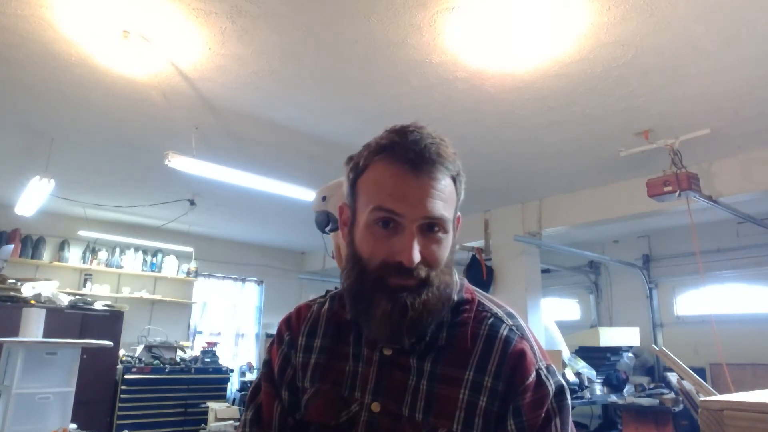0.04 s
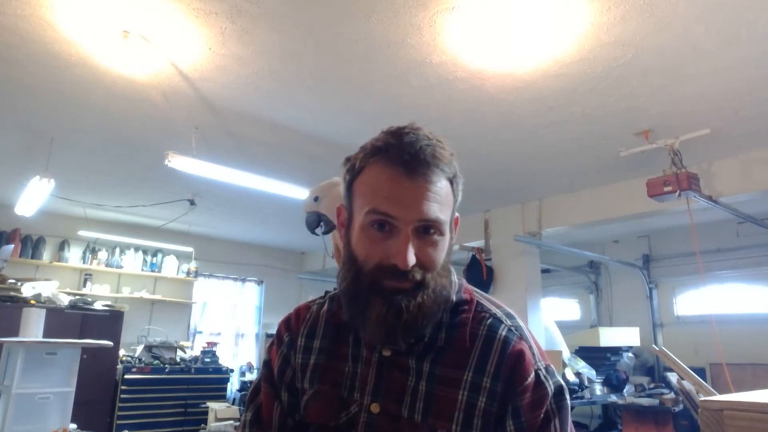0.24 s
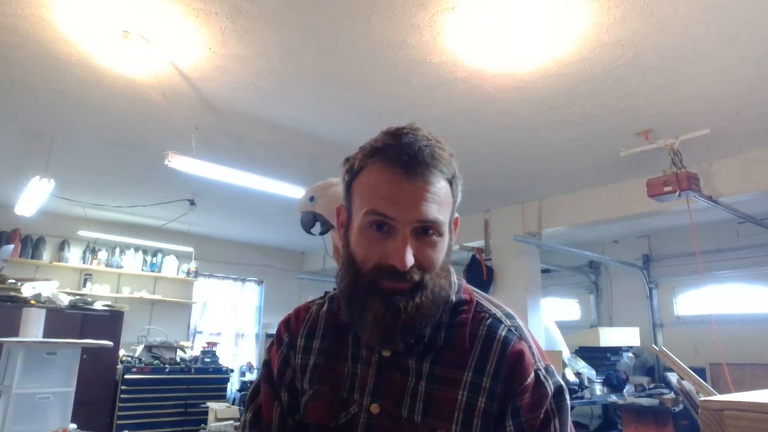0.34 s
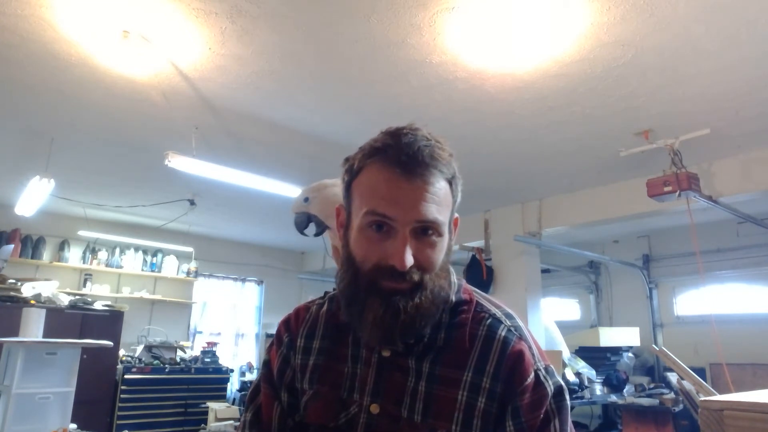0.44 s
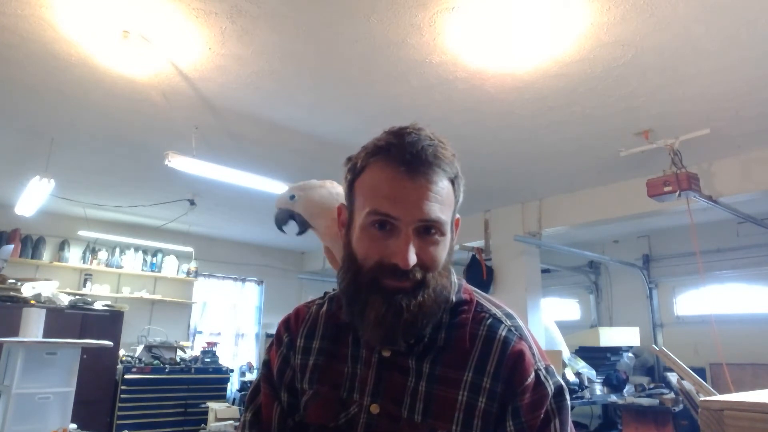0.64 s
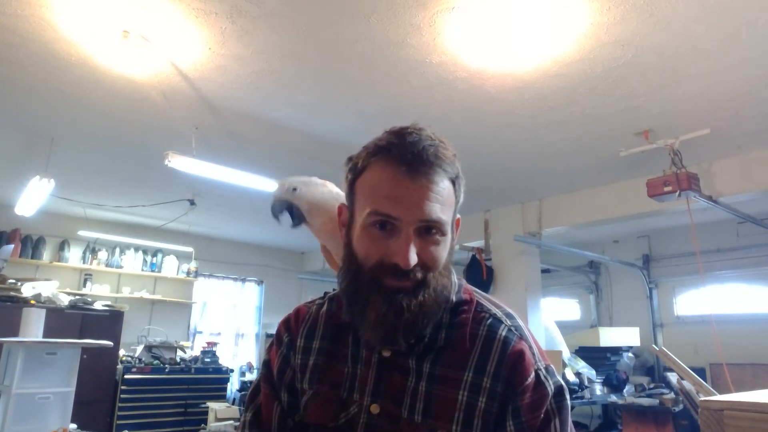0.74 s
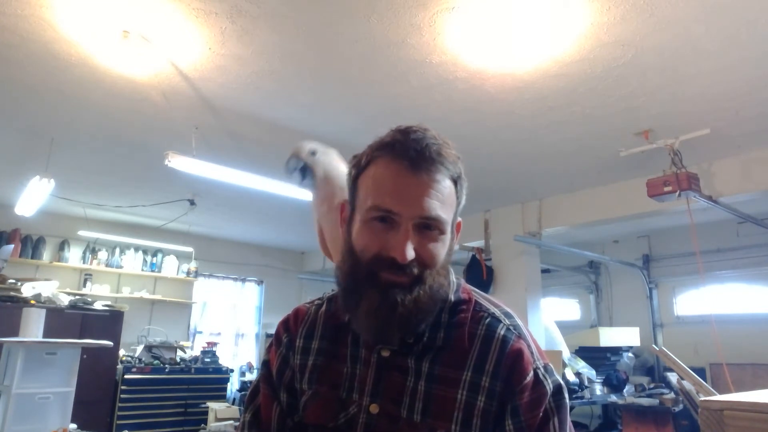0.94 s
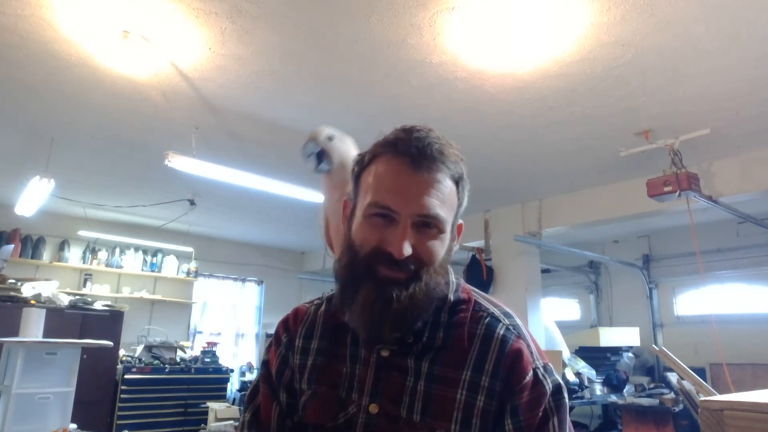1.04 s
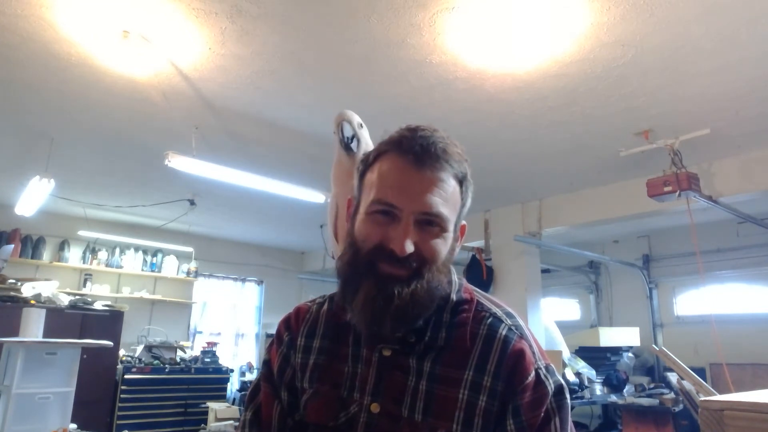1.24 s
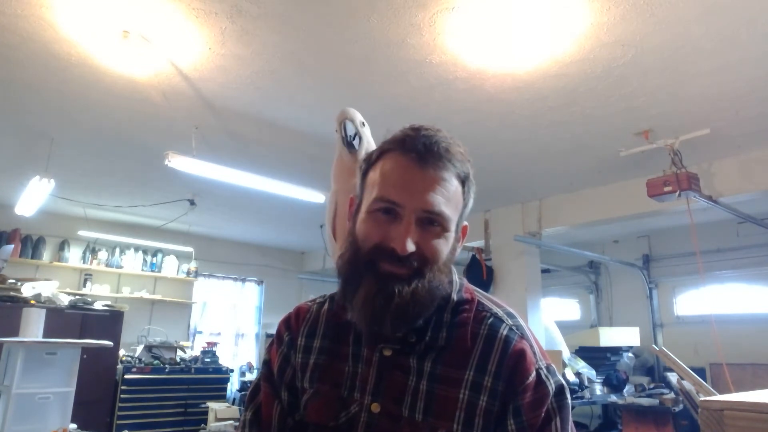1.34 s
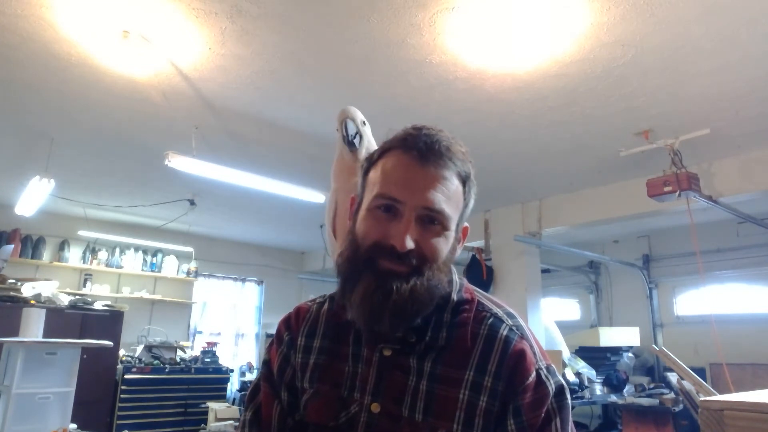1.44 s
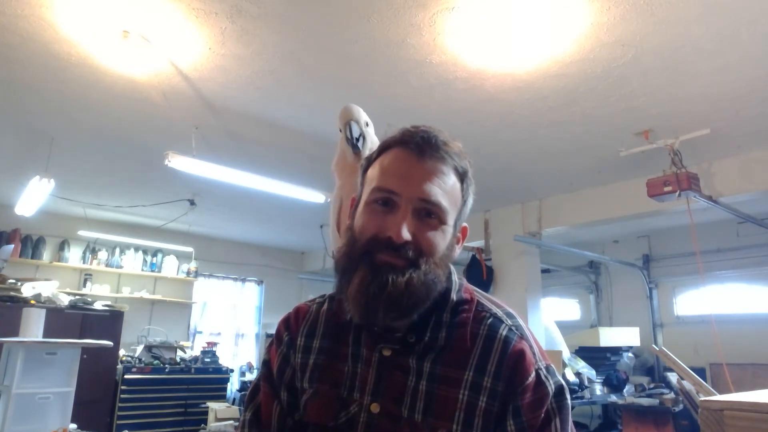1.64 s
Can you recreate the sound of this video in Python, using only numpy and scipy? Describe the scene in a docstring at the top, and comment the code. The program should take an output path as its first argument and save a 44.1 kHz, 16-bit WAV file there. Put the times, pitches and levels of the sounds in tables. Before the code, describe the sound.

A cockatoo lets out one long, harsh, piercing screech that rings in a bare workshop

```python
"""A cockatoo gives one long harsh screech into a small voice microphone in a bare workshop.
Uneven pulses and breath noise ring throat resonances that shift during the call; wavering tones pierce it.
Dense reflections ring after it, over faint noise, a hum and a lingering low note.
The overloaded microphone crackles low down; a noise suppressor cuts the treble of the tail short."""
import sys
import numpy as np
from scipy import signal
from scipy.fft import rfft, irfft
from scipy.io import wavfile
from scipy.ndimage import uniform_filter1d, minimum_filter1d

SR = 44100
rng = np.random.default_rng(int(sys.argv[2]) if len(sys.argv) > 2 else 0)


def inscribe(sig):
    """Save sig as 16-bit PCM at rate SR to the path in sys.argv[1].

    A 1-D sig is mono; a 2-D sig holds one channel per row.
    Samples are clipped to [-1, 1] before scaling.
    """
    pcm = np.round(np.clip(np.atleast_2d(sig).T, -1, 1) * 32767)
    wavfile.write(sys.argv[1], SR, pcm.astype(np.int16))


N = 74970


def from_db(db):
    """Amplitude factor of a level in dB."""
    return 10 ** (np.asarray(db) / 20)


def rms_one(x):
    """Scales a signal to an rms of 1."""
    return x / np.sqrt(np.mean(x ** 2) + 1e-20)


def in_time(rows):
    """Interpolates each column after the first over the seconds in the first."""
    s, *columns = np.transpose(rows)
    return [np.interp(np.arange(N) / SR, s, c) for c in columns]


def faded(rows, axis):
    """Curves in time; the level column falls 6000 dB per s before the first row and after the last."""
    columns, t = in_time(rows), np.arange(N) / SR
    outside_s = np.maximum(rows[0][0] - t, 0) + np.maximum(t - rows[-1][0], 0)
    columns[axis] = columns[axis] - 6000 * outside_s
    return columns


def at_hz(points, hz):
    """Interpolates a table over log frequency."""
    points = np.array(points)
    return np.interp(np.log(hz), np.log(points[:, 0]), points[:, 1])


def drift(rate_hz):
    """Random wander of rms 1: white noise through two equal one-pole lowpasses."""
    r = np.exp(-2 * np.pi * rate_hz / SR)
    wander = signal.lfilter([1], [1, -2 * r, r * r], rng.standard_normal(N + SR))
    return rms_one(wander[SR:])  # settled part


def coloured(x, spectrum):
    """Filters a sound by a table of gain in dB over Hz."""
    hz = np.fft.rfftfreq(len(x), 1 / SR) + 1
    return irfft(rfft(x) * from_db(at_hz(spectrum, hz)), len(x))


def bandpass(x, order, band_hz):
    """Butterworth bandpass."""
    return signal.sosfilt(signal.butter(order, band_hz, "band", fs=SR, output="sos"), x)


# Screech effort. Each row: time in seconds, level in dB, pulse rate in Hz, roughness 0-1,
# share of the late throat shape 0-1.
EFFORT = [(.141, -73.5, 300, 0.34, 0.2), (.149, -56.5, 301.3, 0.36, 0.3), (.165, -43, 300.9, 0.5, 0.08),
          (.19, -31, 302, 0.5, 0.7), (.23, -23, 300.4, 0.53, 0.3), (.31, -6.5, 302.2, 0.33, 0.03),
          (.39, -10, 304.7, 0.37, 0.2), (.46, -8, 305.9, 0.4, 0.4), (.55, -13, 304.5, .5, 0),
          (.69, -8, 303.8, .6, 0.9), (.72, -16, 305.7, 0.5, 0.7), (.75, -12.5, 306.1, .6, 0.1),
          (.77, -10, 303.3, .6, 0), (.88, -9.5, 306.2, 0.73, 0.7), (.98, -11.5, 305.1, .7, .9),
          (1.06, -13, 306.1, 0.84, 1), (1.1, -10.5, 303.4, 0.77, 0.8), (1.16, -12.5, 304.4, 0.74, 1),
          (1.185, -24, 306.4, .8, 1), (1.2, -40, 300, 0.9, 0.5), (1.22, -73, 295, 0.8, .95)]
# Throat resonances early and late. Each row: centre in Hz, width in Hz, level in dB.
THROAT_EARLY = [(897, 36, -23), (1224, 18, -10.5), (1647, 60, -19.5), (2110, 68, 1), (2575, 140, -10),
                (3338, 80, 2.5), (3953, 100, -7), (4864, 12, -18.5), (4800, 30, -15), (5865, 110, -16.5),
                (5464, 120, -11), (6440, 81, -0.5)]
THROAT_LATE = [(1010, 36, -20), (1757, 22, 0.5), (2230, 270, -9), (3350, 26, -2.5), (3488, 43, 1.5),
               (4037, 84, -9.5), (4289, 110, -6.5), (5614, 220, -14), (6445, 68, -25), (6900, 86, 3)]
# Low end of the voice. Each row: time in seconds, level in dB.
CHEST = [(0.15, -80.5), (0.176, -57), (0.212, -45.5), (0.56, -52), (0.904, -36.5), (0.944, -50),
         (0.992, -37), (1.156, -40.5), (1.22, -57.5)]
# Low-end resonances. Each row: centre in Hz, width in Hz, level in dB.
CHEST_PEAKS = [(580, 46, -5), (760, 120, -1), (826, 14, 3)]
RESONANCE_DB = -3.5


def screech():
    """Pulses and breath through early and late throat shapes, plus a weaker noisy low end."""
    db, rate_hz, rough, late = in_time(EFFORT)
    late = np.clip(late, 0, 1)
    source = excitation(rate_hz, np.clip(rough, 0, 1))
    early_rings = np.sqrt(1 - late) * throat(source, THROAT_EARLY)
    late_rings = np.sqrt(late) * throat(source, THROAT_LATE)
    voice = from_db(RESONANCE_DB) * (early_rings + late_rings) + body(source, late)
    voice = signal.sosfilt(signal.butter(6, 860, "high", fs=SR, output="sos"), voice)
    chest = bandpass(throat(rng.standard_normal(N), CHEST_PEAKS), 4, [540, 880])
    sounding = db > db.min() + 1
    return rms_one(voice) * from_db(db) * sounding + rms_one(chest) * from_db(faded(CHEST, axis=0)[0])


JITTER, SHIMMER_DB = .07, 1  # rms period scatter at full roughness; rms pulse level scatter


def excitation(rate_hz, rough):
    """Jittered pulses, crossfaded by roughness to noise puffed out on each."""
    phase = np.cumsum(rate_hz * (1 + JITTER * rough * drift(60.0))) / SR
    clicks = np.diff(np.floor(phase), prepend=0)
    pulses = rms_one(clicks * from_db(SHIMMER_DB * drift(230.0)))
    puffs = rms_one(rng.standard_normal(N) * (0.67 + np.exp(-3 * (phase % 1))))
    return np.sqrt(1 - rough) * pulses + np.sqrt(rough) * puffs


WOBBLE_DB = 3.5


def throat(source, peaks):
    """Parallel two-pole resonances of alternating sign, each fluttering in level."""
    out = 0
    for k, (hz, width_hz, db) in enumerate(peaks):
        r = np.exp(-np.pi * width_hz / SR)
        zeros = np.array([1, 0, -1]) * (1 - r * r) / 2
        poles = [1, -2 * r * np.cos(2 * np.pi * hz / SR), r * r]
        ring = signal.lfilter(zeros, poles, source)
        out = out + (-1) ** k * from_db(db + WOBBLE_DB * drift(7.3)) * ring
    return out


# Broad colour under the resonances. Each row: frequency in Hz, early gain in dB, late gain in dB.
BODY = [(770, -41, -39.5), (960, -21, -17), (1540, -18.5, -20), (1710, -23, -14.5), (2210, -4.5, -22.5),
        (3000, -26.5, -8), (3770, -4, -9), (4020, -16, -10.5), (4430, -29.5, -27), (4800, -42, -24.5),
        (5260, -20.5, -18), (5780, -31, -21), (6466, -11, -22.5), (7280, -14.5, -16.5), (8300, -37, -24.5),
        (8400, -50.5, -48)]
BODY_DB, PATCHINESS_DB = 2.05, 1.5


def body(source, late):
    """Broad colour, early to late; third-octave bands wander in level in five groups, like patchy
    suppressor or codec processing."""
    hz, early_db, late_db = np.transpose(BODY)
    early_part = np.sqrt(1 - late) * coloured(source, np.c_[hz, early_db])
    late_part = np.sqrt(late) * coloured(source, np.c_[hz, late_db])
    spectrum = rfft(early_part + late_part)
    third_octave = np.floor(3 * np.log2(np.fft.rfftfreq(N, 1 / SR) + 1))
    out = 0
    for k in range(5):
        group = irfft(spectrum * (third_octave % 5 == k), N)
        out = out + group * from_db(BODY_DB + PATCHINESS_DB * drift(14.0))
    return out


# Wavering sine partials. Each row: mean frequency in Hz, mean level in dB relative to the effort.
PARTIALS = [(930, -21.5), (1200, -20.5), (1545, -21), (5400, -22.5)]
PITCH_WAVER = .004  # rms share of pitch; also in squeal()


def partials():
    """Three low wavering sines and one high, fading as the throat takes its late shape."""
    db, _, _, late = in_time(EFFORT)
    lines = 0
    for hz, part_db in PARTIALS:
        phase = 2 * np.pi * np.cumsum(hz * (1 + PITCH_WAVER * drift(25.0))) / SR
        lines = lines + from_db(part_db + 3.5 * drift(5.0)) * np.sin(phase)
    return lines * from_db(db) * (db > db.min() + 1) * np.sqrt(1 - np.clip(late, 0, 1))


# Piercing squeal, and a higher one that lingers.
# Each row: time in seconds, pitch in Hz, level in dB, roughness 0-1.
SQUEAL = [(.143, 2040, -49, .2), (.149, 2050, -39, .2), (.165, 2070, -42, .5), (.2, 2090, -26.5, .6),
          (.27, 2100, -22.5, .5), (.32, 2100, -10, .35), (.4, 2100, -18, .4), (.47, 2110, -11, .4),
          (.56, 2150, -23, .5), (.66, 2130, -19, .7), (.72, 2140, -24, .7), (.8, 2180, -21.5, .7),
          (.92, 2180, -26, 0.63), (1.0, 2057, -22, 0.1), (1.18, 2052, -27, 0.6)]
WHISTLE = [(.15, 3900, -52, 0.33), (.2, 3870, -36, 0.6), (.3, 3920, -19, 0), (.4, 3840, -15.5, 0),
           (.48, 3830, -18, 0.2), (.62, 3932, -16, 0.5), (.67, 3884, -19, 0.56), (.7, 3872, -12, .3),
           (.74, 3941, -32, 0.63), (.82, 3912, -16.5, .4), (.88, 3917, -12.5, 0.5),
           (.93, 3991, -16.5, 0.08), (1.0, 3995, -23, 0.41), (1.1, 3979, -17.5, 0.39),
           (1.19, 3923, -31.5, 0.1), (1.33, 3916, -46.5, 0.4)]
SQUEAL_WIDTH_HZ = 100


def squeal(rows, overtones_db):
    """Wavering tone and overtones; roughness swaps each for a narrow noise band on its pitch."""
    hz, db, rough = faded(rows, axis=1)
    rough = np.clip(rough, 0, 1)
    phase = 2 * np.pi * np.cumsum(hz * (1 + PITCH_WAVER * drift(40.0))) / SR
    out = 0
    for k, part_db in enumerate([0] + overtones_db, 1):
        tone = np.sin(k * phase)
        band = drift(SQUEAL_WIDTH_HZ) * tone + drift(SQUEAL_WIDTH_HZ) * np.cos(k * phase)
        out = out + from_db(part_db) * (np.sqrt(2 - 2 * rough) * tone + np.sqrt(rough) * band)
    return out * from_db(db)


# Workshop decay. Each row: frequency in Hz, t60 in seconds.
ROOM_T60 = [(500, 0.14), (1000, 0.75), (1700, 0.59), (2300, 0.46), (2950, 0.57), (3500, 0.28), (4000, 0.41),
            (5200, 0.68), (6500, .42), (8000, 0.18)]
ROOM_DB, ROOM_GAP_S = -6.5, 0.0046


def workshop(x):
    """Dense reflections: quarter-octave noise bands, each dying at its own rate."""
    t = np.arange(SR) / SR
    edges_hz = 400 * 2 ** np.arange(0, 4.6, 1 / 4)
    tail = 0
    for low, high in zip(edges_hz, edges_hz[1:]):
        band = bandpass(rng.standard_normal(SR), 2, [low, high])
        tail = tail + band * from_db(-60 * t / at_hz(ROOM_T60, np.sqrt(low * high)))
    tail = tail * (t > ROOM_GAP_S)
    tail = tail / np.sqrt(np.sum(tail ** 2)) * 0.61
    return from_db(ROOM_DB) * signal.fftconvolve(x, tail)[:N]


# Noise floor colour. Each row: frequency in Hz, gain in dB.
FLOOR = [(30, -10), (60, -21), (120, -3), (200, -10.5), (350, -9), (600, -9), (1000, -9.5), (1350, -13),
         (1700, -29.5), (3000, -44)]
FLOOR_DB = -74.5
HUM_HZ, HUM_DB, HUM_WAVER_DB, HUM_RATE_HZ = 119, -84, 4, 6.0
HUM_SWELL_S, HUM_SWELL_WIDTH_S, HUM_SWELL_DB = 1.2, 0.03, 19
RING_HZ, RING_S, RING_T60_S, RING_DB = 420, 1.2, 0.37, -46.5


def room_tone():
    """Faint coloured noise, a wavering hum that swells briefly and a decaying low sine note."""
    t = np.arange(N) / SR
    swell_db = HUM_SWELL_DB * np.exp(-((t - HUM_SWELL_S) / HUM_SWELL_WIDTH_S) ** 2)
    hum_db = HUM_DB + HUM_WAVER_DB * drift(HUM_RATE_HZ) + swell_db
    hum = from_db(hum_db) * np.sin(2 * np.pi * HUM_HZ * t)
    noise = rms_one(coloured(rng.standard_normal(N), FLOOR + [(4000, -65.0)]))
    noise = from_db(FLOOR_DB + 2.5 * drift(15.0)) * noise
    after_s = np.maximum(t - RING_S, 0)
    note_level = from_db(RING_DB - 60 * after_s / RING_T60_S) * np.minimum(after_s / .03, 1)
    return note_level * np.sin(2 * np.pi * RING_HZ * t) + noise + hum


def scene():
    """The bird, its reflections and the room tone."""
    bird = screech() + partials() + squeal(SQUEAL, [-23]) + squeal(WHISTLE, [])
    return (bird + workshop(bird) + room_tone())[None]


# Microphone crackle. Each row: time in seconds, thud level in dB, rasp level in dB.
CRACKLE = [(0.3, -81, -55.5), (0.39, -60.5, -56.5), (0.464, -47.5, -44), (0.502, -43.5, -38),
           (0.546, -57, -55), (0.576, -45.5, -44.5), (0.602, -56.5, -42), (0.636, -38, -38),
           (0.702, -38, -30.5), (0.72, -56, -50.5), (0.73, -31.5, -52), (0.746, -32.5, -25),
           (0.77, -46.5, -44.5), (0.796, -31.5, -26), (0.844, -26.5, -31), (0.88, -27.5, -29.5),
           (0.91, -19.5, -25.5), (0.938, -39, -33.5), (1.014, -35.5, -35), (1.054, -41.5, -37.5),
           (1.078, -31, -28), (1.11, -34.5, -33), (1.142, -47.5, -45), (1.3, -94, -73)]
# Crackle bands. Each list: low edge in Hz, high edge in Hz.
THUD_HZ = [59.4, 342]
RASP_HZ = [418, 574]
CRACKLE_ONSET = .8  # times the local rms


def crackle(x):
    """Positive peaks overload the capsule; their squared excess leaves low thuds and a rasp."""
    level = np.sqrt(np.abs(uniform_filter1d(x ** 2, size=2000)) + 1e-12)
    excess = np.maximum(x / level - CRACKLE_ONSET, 0) ** 2
    out = 0
    for k, band_hz in enumerate((THUD_HZ, RASP_HZ)):
        low = bandpass(excess, 3, band_hz)
        evened = low / np.sqrt(np.abs(uniform_filter1d(low ** 2, size=1200)) + 1e-6)
        out = out + evened * from_db(faded(CRACKLE, axis=k)[k])
    return out


# Faint ticks. Each row: time in seconds, level in dB before a 7 dB lift.
TICKS = [(0.32, -43.5), (0.659, -47), (0.6674, -28), (0.6786, -24), (0.6877, -20.5)]


def ticks():
    """One-sample clicks."""
    out = np.zeros(N)
    for s, db in TICKS:
        out[int(s * SR)] = from_db(db + 7)
    return out


GATE_DB, GATE_SLOPE, GATE_FROM_HZ, GATE_S = -54.5, 0.91, 1100, 0.022  # slope: dB cut per dB below
LIMIT_S = 0.0015
IMAGE_DB, CAPTURE_HZ = -53, 16000
CUTOFF_HZ, TOP_HZ = 8350, 16000


def record(dry):
    """Overload, suppressor on quiet treble, limiter, voice-band capture and its faint resampling mirror."""
    x = dry[0] + crackle(dry[0])
    low = signal.sosfiltfilt(signal.butter(2, GATE_FROM_HZ, fs=SR, output="sos"), x)
    treble = x - low
    treble_db = 10 * np.log10(np.abs(uniform_filter1d(treble ** 2, int(GATE_S * SR))) + 1e-14)
    x = low + treble * from_db(GATE_SLOPE * np.minimum(treble_db - GATE_DB, 0))
    span = int(LIMIT_S * SR)
    limit_gain = minimum_filter1d(np.minimum(1, .77 / (np.abs(x) + 1e-9)), span)
    x = x * uniform_filter1d(limit_gain, span)
    x = signal.sosfilt(signal.cheby2(8, 50, CUTOFF_HZ, fs=SR, output="sos"), x)
    mirror = x * np.cos(2 * np.pi * CAPTURE_HZ * np.arange(N) / SR)
    mirror = signal.sosfilt(signal.butter(8, 11000, "high", fs=SR, output="sos"), mirror)
    x = x + from_db(IMAGE_DB) * mirror + ticks()
    return signal.sosfilt(signal.cheby2(12, 40, TOP_HZ, fs=SR, output="sos"), x)[None]


dry = scene()
out = record(dry)
inscribe(out)
```